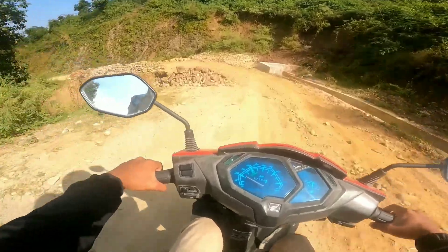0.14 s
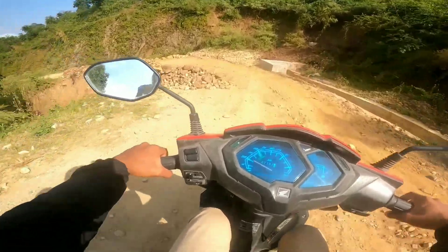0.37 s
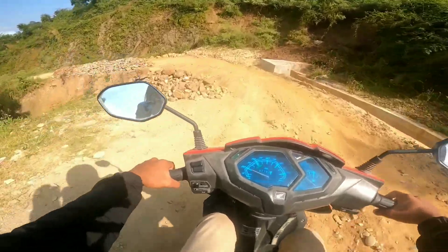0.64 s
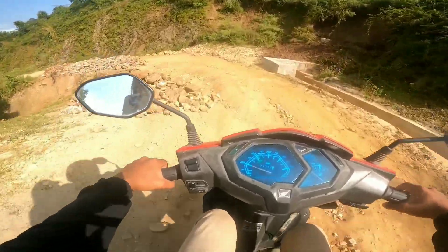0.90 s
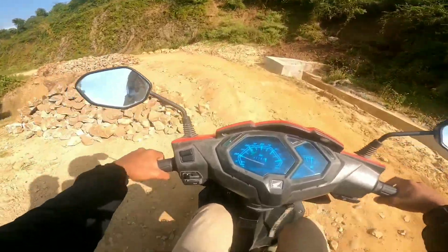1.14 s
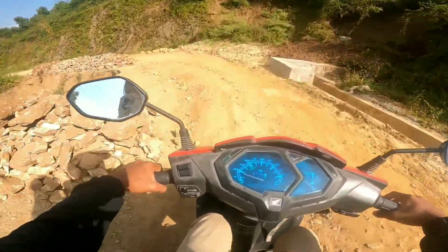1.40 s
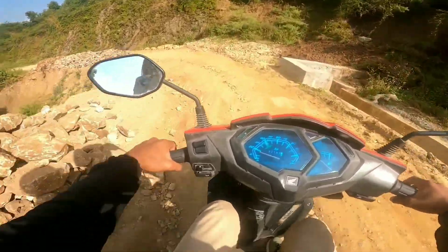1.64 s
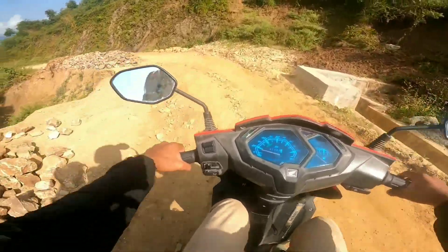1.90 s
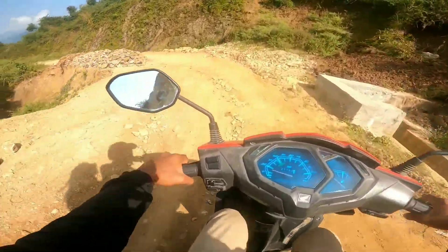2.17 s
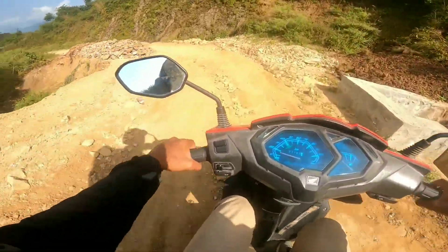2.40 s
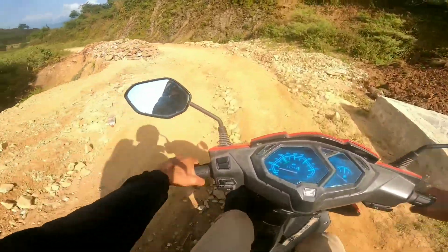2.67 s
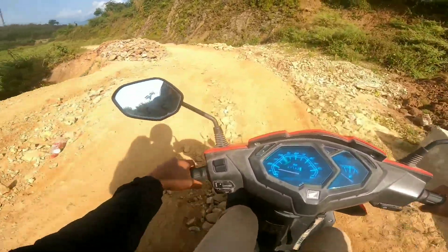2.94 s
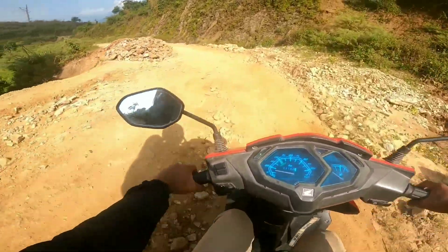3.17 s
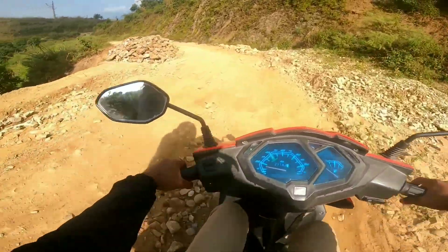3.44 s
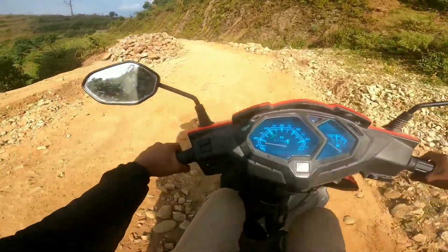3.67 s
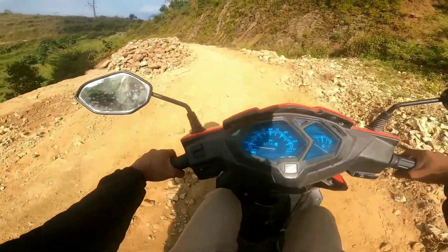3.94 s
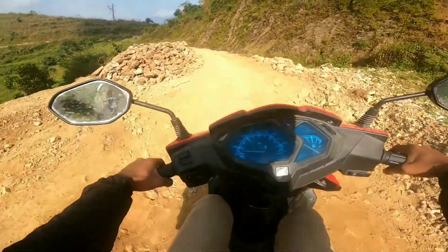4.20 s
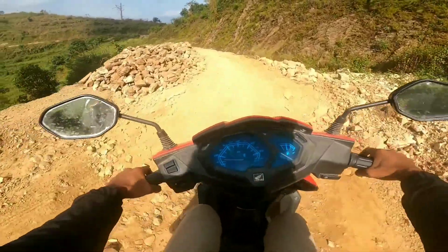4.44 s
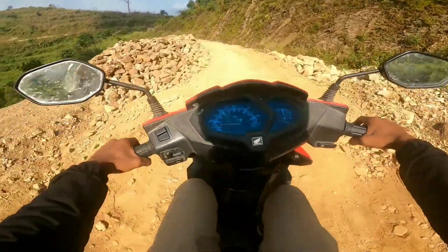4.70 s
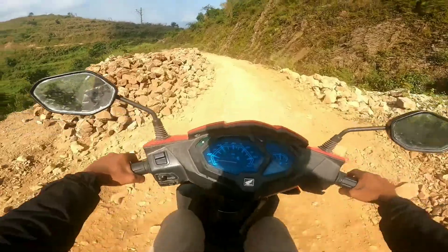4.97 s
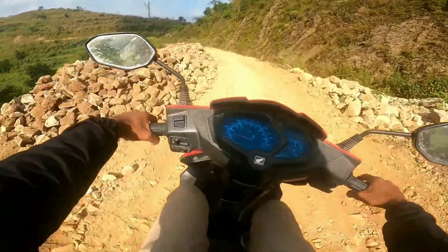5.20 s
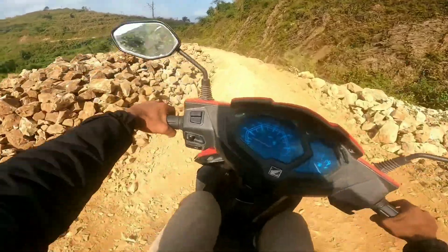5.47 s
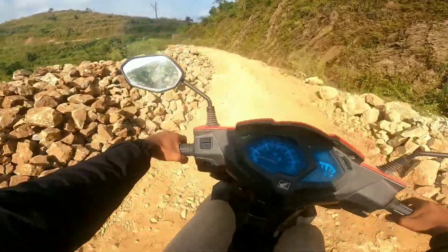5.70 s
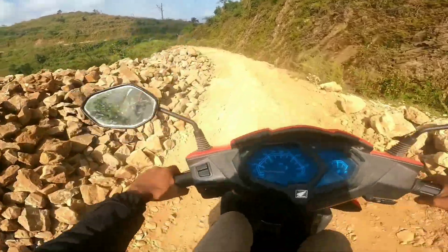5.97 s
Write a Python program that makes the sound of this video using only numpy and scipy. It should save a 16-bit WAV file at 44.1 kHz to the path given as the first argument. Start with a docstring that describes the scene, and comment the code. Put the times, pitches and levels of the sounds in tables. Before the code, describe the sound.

A scooter rolls slowly over a rough gravel track, heard close from a covered microphone worn by the rider, with dulled treble and no obvious echo. Gusty low wind, a faint wavering engine throb and thin tyre hiss run throughout. The first second is fairly light: hollow panel rumble, soft frame thumps around 0.4 and a few small clacks. From 1.1 to 1.9 the gravel thickens, with crunch, clustered stone ticks and firmer thumps. Hard knocks and clacks burst out near 2.15, 2.5 and 2.8, followed by a brief lull. The roughest jolts come at 3.3 to 3.8, with a sharp clack, short squeaks and a heavy floorboard knock near 3.6. After another easing, strong thumps land around 4.3. Lighter rattles continue past 5, thinning before a heavy bump at 5.75 and a smaller one near 5.93, still rolling at the end.

```python
"""Scooter on a gravel track

A scooter rolls slowly over rough gravel, heard from a microphone worn by the rider.
Coloured noise makes the wind and the tyre hiss, and a wavering sine makes the engine's low throb.
Random stone contacts ring the body panels and smaller parts into a hollow rumble and crunch.
Bumps thump the frame, stones knock the floorboard, loose parts clack and squeak: short pushes that ring.
Small stones tick against the underside as quick puffs of noise."""
import sys
import numpy as np
from scipy import signal
from scipy.fft import rfft, irfft
from scipy.io import wavfile

SR = 44100
rng = np.random.default_rng(int(sys.argv[2]) if len(sys.argv) > 2 else 0)


def generate_wav(sig):
    """Save sig (samples, or channels by samples) to the path in sys.argv[1] as 16-bit PCM at SR."""
    pcm = np.round(np.clip(np.atleast_2d(sig).T, -1, 1) * 32767).astype(np.int16)
    wavfile.write(sys.argv[1], SR, pcm)


def invert_db(x):
    """Field ratio 10**(x/20) for x, a level in decibels (scalar or array-like)."""
    u = np.asarray(x, float) / 20
    return 10 ** u


N = 269004  # length in samples

# colour of the tyre noise: (pitch_hz, relative level_db per Hz)
GRIT_COLOUR = [(1500, 9.5), (2000, -3.5), (2600, 0.5), (3600, -4), (4700, -4), (6000, -11), (9000, -12.5),
               (16000, -22.5)]
# rings of the loose parts: (pitch_hz, relative level_db, time to fall 60 dB t60_s)
LOOSE_PART_RINGS = [(1321, -2.5, 0.058), (1420, -4.5, 0.029), (1697, -3.5, 0.026), (1770, 10, 0.028),
                    (1923, -5.5, 0.044), (2035, -3, 0.037), (2340, 6.5, 0.027), (2780, 2.5, 0.027),
                    (3600, 2.5, 0.013), (3900, 0, 0.014), (4700, -6, 0.023)]


def rms_one(x):
    """Scale to unit rms, the usual measure of average strength."""
    return x / np.sqrt(np.mean(x ** 2) + 1e-20)


def in_time(rows):
    """Turn the columns of a table into curves over time, with one value a sample."""
    s, *columns = np.transpose(rows)
    return [np.interp(np.arange(N) / SR, s, c) for c in columns]


def drift(rate_hz):
    """Slow chance: noise at every 20th sample, smoothed twice by a one-pole low-pass; rms 1."""
    r = np.exp(-2 * np.pi * rate_hz * 20 / SR)
    noise = rng.standard_normal(N // 20 + 2002)
    slow = signal.lfilter([1], [1, -2 * r, r * r], noise)[2000:]  # skip the filter's start
    return np.interp(np.arange(N) / 20, np.arange(len(slow)), rms_one(slow))


def ring(clicks, hz, t60_s):
    """A resonance: each unit click starts a dying sine of height 1, down 60 dB after t60_s."""
    r = invert_db(-60 / (t60_s * SR))
    w = 2 * np.pi * hz / SR
    return signal.lfilter([0, np.sin(w)], [1, -2 * r * np.cos(w), r * r], clicks + 1e-18)


def coloured(spectrum, envelope, patchy_db, patch_rate_hz):
    """Third-octave bands of noise under an envelope, each band with its own level and flicker."""
    hz_points, db_points = np.transpose(spectrum)
    octaves = np.log2(hz_points[-1] / hz_points[0])
    edges = hz_points[0] * 2 ** np.arange(0, octaves, 1 / 3)
    white = envelope * rng.standard_normal((2, N)) + 1e-18
    out = 0
    for k, (low, high) in enumerate(zip(edges, edges[1:])):
        band_filter = signal.butter(2, [low, high], "band", fs=SR, output="sos")
        band = signal.sosfilt(band_filter, white[k % 2])  # neighbours use different noise
        level_db = np.interp(np.log(low * high) / 2, np.log(hz_points), db_points)
        out = out + band * invert_db(level_db + patchy_db * drift(patch_rate_hz))
    return out


def stones_into(modes, per_s, spread_db, clumps, waver_db):
    """Clumped random stone contacts each strike a random share of the wavering rings; rms 1."""
    sizes = invert_db(spread_db * np.minimum(rng.exponential(1, N), 4)) * rng.choice([-1, 1], N)
    contacts = sizes * (rng.random(N) < per_s * clumps / SR)
    out = 0
    for hz, db, t60_s in modes:
        luck = rng.standard_normal(N)
        reached = rng.random(N) < 0.6  # share of contacts that reach this ring
        load = invert_db(waver_db * drift(9.1))  # rings come and go as the load shifts
        out = out + invert_db(db) * ring(contacts * luck * reached * load, hz, t60_s)
    return rms_one(out)


def blows(events, modes, swell_s, rough, off_db_per_octave):
    """A brief uneven push, then rings shifted to the favoured pitch and weaker away from it."""
    strike_spread_db = 5.5  # how unevenly a blow sets the rings going
    out, size, swell = np.zeros(N + SR), SR // 4, round(swell_s * SR)
    t = np.arange(swell) / SR
    pitches = np.array(modes)[:, 0]
    chances = rng.standard_normal((len(events), 1200))
    for (mid_s, peak_db, favoured_hz), chance in zip(events, chances):
        nearest = np.argmin(np.abs(np.log(pitches / favoured_hz)))
        shift = favoured_hz / pitches[nearest]  # the part's seating moves all its pitches
        body = 0
        for (hz, db, t60_s), luck in zip(modes, chance[::-1]):
            pitch_hz = hz * shift
            push = np.zeros(size)
            push[:swell] = np.hanning(swell) * (np.cos(2 * np.pi * pitch_hz * t) + rough * chance[:swell])
            octaves_off = abs(np.log2(pitch_hz / favoured_hz))
            strength_db = db + strike_spread_db * luck - off_db_per_octave * octaves_off
            body = body + invert_db(strength_db) * ring(push, pitch_hz, t60_s)
        start = max(round(mid_s * SR) - swell // 2, 0)
        out[start:start + size] += invert_db(peak_db) * body / np.max(np.abs(body))
    return out[:N]


def wind():
    """Wind buffets the microphone: deep noise that follows the gusts, with random buffeting on top."""
    # points on the curve of the gusts: (time_s, level_db before buffeting)
    gusts = [(0.0, -39.5), (0.73, -37.5), (0.78, -43), (0.87, -34), (1.82, -29), (2.07, -39.5), (2.24, -28),
             (2.28, -36), (2.51, -28.5), (3.02, -40.5), (3.06, -29), (3.11, -36.5), (3.67, -29.5),
             (4.13, -38), (4.23, -27.5), (4.48, -44.5), (4.69, -31.5), (5.25, -29.5), (5.47, -35),
             (5.69, -31), (5.71, -42), (6.1, -33.5)]
    # colour of the wind: (pitch_hz, relative level_db per Hz)
    wind_colour = [(12, 1.5), (18, 9), (30, -3.5), (45, 0), (70, 2.5), (100, -1), (200, -5), (280, -16.5)]
    buffet_db, buffet_rate_hz = -2, 0.91
    level_db = in_time(gusts)[0] + buffet_db * drift(buffet_rate_hz)
    return invert_db(level_db) * rms_one(coloured(wind_colour, 1, 0.97, 33.0))


def engine():
    """The firing rate reaches the rider as a deep throb: a sine whose pitch wavers."""
    # points on the curves of the throb: (time_s, firing rate pitch_hz before wavering, rms level_db)
    throb = [(0.0, 24, -43.5), (0.13, 24.1, -38.5), (0.25, 26.15, -50.5), (0.64, 26.18, -34.5),
             (0.81, 27.14, -42.5), (0.93, 28.4, -44), (1.32, 28.7, -38), (1.58, 22.75, -39),
             (1.72, 21.58, -40.5), (1.87, 29.2, -40), (2.36, 30.36, -35.5), (2.94, 26.94, -42.5),
             (3.62, 27.76, -30.5), (3.94, 31.83, -41), (4.4, 32.58, -39), (4.5, 30.34, -39),
             (4.93, 31.84, -32), (5.1, 30.17, -34.5), (5.38, 29.2, -41), (5.72, 28.1, -45.5),
             (5.91, 26.1, -40.5), (6.1, 25.9, -31)]
    hz, level_db = in_time(throb)
    phase = 2 * np.pi * np.cumsum(hz * (1 + 0.119 * drift(4.75))) / SR
    return np.sqrt(2) * invert_db(level_db) * np.sin(phase)


def rolling_hiss():
    """The steady tyre hiss that stays between stony patches."""
    return invert_db(-57) * rms_one(coloured(GRIT_COLOUR, 1, 1.0, 25))


def grit(patch):
    """Tyres throw up fine grit: hiss with dying grains in it, more of them on loose patches."""
    # points on the curve of the thrown grit: (time_s, relative level_db)
    spray = [(0.0, -57), (0.07, -49), (0.67, -55), (1.15, -48.5), (1.18, -44.5), (1.3, -54), (1.37, -43.5),
             (1.42, -48), (1.47, -42), (1.69, -56.5), (1.76, -43), (2.01, -61.5), (2.04, -37), (2.1, -59),
             (2.16, -44.5), (2.18, -47), (2.45, -52), (2.55, -41), (2.62, -49.5), (2.79, -53), (2.82, -44),
             (2.86, -58), (3.01, -58), (3.08, -45), (3.13, -59), (3.26, -51), (3.29, -37), (3.38, -49),
             (3.46, -52), (3.5, -38.5), (3.52, -44.5), (3.65, -43.5), (4.09, -60), (4.16, -50),
             (4.22, -50.5), (4.28, -40), (4.45, -51), (4.46, -42), (4.48, -55), (4.56, -56.5),
             (4.72, -45.5), (4.8, -53), (4.97, -50), (5.02, -41.5), (5.15, -49), (5.19, -47), (5.22, -48),
             (5.27, -44), (5.34, -53), (5.38, -42), (5.41, -55), (5.58, -47), (5.61, -52), (5.73, -54.5),
             (5.76, -41), (5.8, -58), (5.9, -54), (5.93, -47), (6.05, -47), (6.07, -44)]
    grains_per_s, grain_spread_db, grain_t60_s = 320, 4.5, 0.014
    sizes = invert_db(grain_spread_db * np.minimum(rng.exponential(1, N), 4) - 4.0)
    grains = sizes * (rng.random(N) < grains_per_s * invert_db(3.0 * patch) / SR)
    crackle = signal.lfilter([1], [1, -invert_db(-60 / (grain_t60_s * SR))], grains)
    noise = rms_one(coloured(GRIT_COLOUR, invert_db(1.0 * patch) + 0.22 * crackle, 3.3, 19))
    return invert_db(in_time(spray)[0] - 1.5) * noise


def ticks():
    """A small stone's tick is a puff of noise that builds fast and dies fast; dull ones lose their top."""
    # stones on the underside: (start_s, relative level_db, dullness 0-1, time to fall 60 dB t60_s)
    tick_events = [(0.178, -35, 0.7, 0.016), (0.344, -43, 0.7, 0.016), (0.483, -43, 0.1, 0.013),
                   (0.596, -51, 0.2, 0.012), (0.705, -38, 0.7, 0.019), (0.766, -39, 0.6, 0.017),
                   (0.959, -29, 0.78, 0.021), (1.061, -33, 0.8, 0.016), (1.1316, -30, 0.96, 0.02),
                   (1.1702, -27, 0.8, 0.016), (1.192, -30, 0.6, 0.018), (1.2392, -27, 0.74, 0.021),
                   (1.3452, -22.5, 0.77, 0.018), (1.4606, -30.5, 0.7, 0.02), (1.515, -35.5, 0.1, 0.023),
                   (1.5605, -29, 0.8, 0.031), (1.7484, -28.5, 1, 0.02), (1.788, -37, 0.2, 0.026),
                   (1.855, -34.5, 0.54, 0.016), (2.0382, -30.5, 0.6, 0.037), (2.136, -37, 0.6, 0.015),
                   (2.15, -16, 0.72, 0.018), (2.228, -32, 0.4, 0.014), (2.294, -30, 0.57, 0.026),
                   (2.373, -33, 0.7, 0.016), (2.4369, -40, 0.5, 0.014), (2.48, -34, 0.25, 0.02),
                   (2.5535, -20, 0.55, 0.014), (2.59, -29, 0.84, 0.017), (2.68, -31, 0.85, 0.022),
                   (2.8132, -27.5, 0.6, 0.016), (3.0666, -34, 0.85, 0.036), (3.094, -36, 0.65, 0.013),
                   (3.2776, -34, 0.35, 0.018), (3.288, -29, 0.56, 0.029), (3.2995, -18, 0.47, 0.023),
                   (3.33, -30, 0.3, 0.019), (3.4037, -29, 0.8, 0.012), (3.4949, -22, 0.72, 0.034),
                   (3.57, -24, 0.82, 0.019), (3.6032, -26, 0.5, 0.014), (3.6542, -29, 0.4, 0.023),
                   (3.702, -41, 0.3, 0.013), (3.7268, -27, 0.76, 0.023), (3.766, -35, 0.5, 0.016),
                   (3.8072, -28, 0.53, 0.022), (4.128, -26.5, 0.78, 0.014), (4.1634, -32, 0.9, 0.02),
                   (4.237, -40, 0.6, 0.016), (4.2634, -20, 0.73, 0.021), (4.291, -27.5, 0.1, 0.021),
                   (4.31, -31, 0.3, 0.013), (4.335, -37, 0.4, 0.022), (4.368, -36, 0.2, 0.05),
                   (4.4, -40.5, 0.4, 0.027), (4.43, -37, 0.5, 0.03), (4.4575, -21.5, 0.56, 0.0089),
                   (4.64, -34, 0.2, 0.019), (4.714, -34, 0.3, 0.035), (4.7367, -34.5, 0.3, 0.027),
                   (4.916, -32.5, 0.3, 0.015), (4.984, -25, 1, 0.019), (5.018, -20.5, 0.63, 0.013),
                   (5.045, -32, 0.5, 0.024), (5.096, -35, 1, 0.016), (5.165, -34, 0.2, 0.021),
                   (5.259, -34, 0.8, 0.024), (5.2787, -27.5, 0.4, 0.02), (5.353, -32, 0.7, 0.012),
                   (5.3706, -26.5, 0.27, 0.016), (5.4967, -41, 0.2, 0.014), (5.558, -28, 0.79, 0.019),
                   (5.754, -25.5, 0.8, 0.018), (5.9155, -39, 0.5, 0.013), (5.9501, -32.5, 0.27, 0.036),
                   (5.978, -30.5, 0.2, 0.018)]
    # colour of the ticks: (pitch_hz, relative level_db per Hz)
    tick_colour = [(1500, -5.5), (2600, -4), (4000, -6.5), (5500, -10), (8000, -12.5), (16000, -17)]
    rise_s = 0.0014
    puffs, t = np.zeros((2, N + SR)), np.arange(SR // 10) / SR
    for s, level_db, dullness, t60_s in tick_events:
        share, start = np.clip(dullness, 0, 1), round(s * SR)
        puff = invert_db(level_db - 60 * t / max(t60_s, .003)) * np.minimum(t / rise_s, 1)
        puffs[:, start:start + len(t)] += np.outer([1 - share, share], puff)
    soften = signal.butter(2, 3000, fs=SR, output="sos")  # low-pass at 3000 Hz
    bright = coloured(tick_colour, puffs[0, :N], 2.5, 30)
    muffled = signal.sosfilt(soften, coloured(tick_colour[:4], puffs[1, :N], 1.8, 33))
    return invert_db(13) * bright + invert_db(11.5) * muffled


def squeaks():
    """Loose parts rub for a moment: a longer push gives a held ring."""
    # squeaks: (middle of the push mid_s, peak level_db, favoured pitch_hz)
    squeak_events = [(1.702, -49, 3880), (3.311, -30, 1427), (3.352, -28, 1420), (3.665, -36.5, 1750),
                     (3.68, -38.5, 1890), (4.835, -35, 1740), (3.972, -39.5, 1510)]
    return blows(squeak_events, LOOSE_PART_RINGS, 0.026, rough=1.4, off_db_per_octave=112)


def clacks():
    """Loose parts clack: a short rough push sets them ringing."""
    # clacks: (middle of the push mid_s, peak level_db, favoured pitch_hz)
    clack_events = [(0.064, -33, 1777), (0.178, -37.5, 1670), (0.366, -52, 1800), (0.468, -34.5, 1770),
                    (1.138, -29, 1773), (1.139, -42, 2780), (1.174, -39.5, 3600), (1.174, -35, 2340),
                    (1.177, -32, 1304), (1.198, -35, 2780), (1.194, -27.5, 1932), (1.202, -35.5, 1840),
                    (1.462, -23.5, 1789), (1.49, -30.5, 1770), (1.51, -32, 1420), (1.568, -34.5, 2780),
                    (1.765, -27.5, 1260), (1.8285, -35.5, 1760), (1.93, -31, 1396), (2.046, -28, 1850),
                    (2.054, -28, 1636), (2.155, -18, 1785), (2.155, -36, 2040), (2.298, -27.5, 1760),
                    (2.379, -23, 1780), (2.443, -29.5, 1730), (2.447, -37, 1970), (2.5543, -26.5, 1680),
                    (2.813, -38.5, 3500), (2.814, -19.5, 1770), (2.849, -32, 1620), (3.28, -29.5, 1860),
                    (3.292, -15, 1785), (3.332, -21, 1760), (3.386, -42, 1770), (3.4, -41, 1880),
                    (3.497, -19.5, 1760), (3.6047, -24.5, 1420), (3.702, -38, 3900), (3.729, -33, 2340),
                    (3.816, -29, 1950), (4.16, -28, 1363), (4.247, -32.5, 1930), (4.277, -37, 4490),
                    (4.283, -28.5, 1430), (4.319, -31, 1946), (4.292, -36, 2470), (4.43, -29.5, 1500),
                    (4.459, -36, 2227), (4.668, -32, 1970), (4.9312, -30.5, 1940), (4.996, -33.5, 1360),
                    (5.017, -26.5, 1510), (5.096, -28.5, 1976), (5.185, -24, 1420), (5.18, -42, 4360),
                    (5.19, -38, 2460), (5.375, -33, 2780), (5.3764, -28.5, 1740), (5.722, -36, 1750),
                    (5.757, -34.5, 4700), (5.758, -32.5, 1925), (5.937, -23, 1900), (5.994, -30, 1810)]
    return blows(clack_events, LOOSE_PART_RINGS, 0.010, rough=4, off_db_per_octave=53)


def knocks():
    """Larger stones knock the floorboard: a very short, very rough push sets it ringing."""
    # knocks: (middle of the push mid_s, peak level_db, favoured pitch_hz)
    knock_events = [(1.232, -37, 727), (1.374, -22, 904), (1.438, -24.5, 600), (1.498, -31.5, 560),
                    (1.565, -25, 538), (1.78, -29.5, 723), (2.006, -24.5, 560), (2.058, -20, 550),
                    (2.117, -27, 726), (2.152, -17, 978), (2.47, -20, 747), (2.532, -12.5, 532),
                    (2.639, -25.5, 765), (2.798, -28, 823), (2.812, -17, 560), (3.064, -25.5, 608),
                    (3.173, -28, 597), (3.265, -22, 558), (3.286, -18.5, 775), (3.484, -17, 624),
                    (3.378, -36, 1110), (3.615, -11, 528), (3.701, -31, 1100), (3.819, -21, 930),
                    (3.945, -24.5, 697), (4.164, -21.5, 1010), (4.218, -24.5, 1070), (4.268, -24, 744),
                    (4.311, -27, 974), (4.356, -28.5, 928), (4.628, -27, 560), (4.771, -25, 780),
                    (4.889, -28, 1065), (4.997, -25.5, 954), (5.689, -21.5, 540), (5.7555, -19, 787),
                    (5.937, -19.5, 560)]
    # rings of the floorboard: (pitch_hz, relative level_db, time to fall 60 dB t60_s)
    floorboard = [(590, -10, 0.032), (555, 6, 0.028), (715, 9, 0.024), (880, 7, 0.022), (1052, 4, 0.032)]
    return blows(knock_events, floorboard, 0.00357, rough=7.2, off_db_per_octave=28)


def thumps():
    """Bumps thump the frame: a short, fairly smooth push sets its low rings going."""
    # thumps: (middle of the push mid_s, peak level_db, favoured pitch_hz)
    thump_events = [(0.017, -27, 194.4), (0.262, -22.5, 243), (0.364, -16.5, 267), (0.417, -20, 258),
                    (0.766, -26, 211), (1.035, -34, 191), (1.11, -15, 301), (1.385, -23.5, 265),
                    (1.438, -23, 215), (1.515, -12, 302), (1.785, -23.5, 242), (1.822, -13, 300),
                    (1.932, -18.5, 253), (2.055, -22.5, 300), (2.24, -24.5, 240), (2.495, -18.5, 295),
                    (2.567, -16.5, 265), (2.637, -14.5, 243), (3.007, -21, 261), (3.276, -23.5, 209),
                    (3.291, -18.5, 301), (3.316, -16, 252), (3.483, -19, 246), (3.55, -17.5, 300),
                    (3.629, -16, 252), (3.709, -15, 249), (3.808, -15.5, 283.5), (4.273, -12, 290),
                    (4.374, -10, 257), (4.403, -26.5, 265), (4.624, -25.5, 292), (3.765, -20.5, 235),
                    (5.08, -21.5, 253), (5.28, -38, 249), (5.659, -22.5, 268), (5.761, -11, 233.5),
                    (5.797, -29.5, 300), (5.93, -16.5, 252)]
    # rings of the frame: (pitch_hz, relative level_db, time to fall 60 dB t60_s)
    frame_rings = [(196, 4.5, 0.015), (239.5, 1, 0.096), (265, -3.5, 0.083), (300, -3.5, 0.05),
                   (420, 8.5, 0.04)]
    return blows(thump_events, frame_rings, 0.0062, rough=0.6, off_db_per_octave=34.5)


def crunch(patch):
    """Loose gravel crunches: stone contacts ring smaller parts and stones very briefly."""
    # points on the curve of how much loose gravel the tyres meet: (time_s, level_db)
    gravel = [(0.0, -36.5), (0.24, -40), (0.29, -37.5), (0.59, -42), (1.03, -39), (1.05, -34.5),
              (1.31, -39.5), (1.38, -31.5), (1.41, -43), (1.44, -34), (1.53, -31.5), (1.7, -40),
              (1.78, -32.5), (1.83, -27.5), (1.87, -37), (2.0, -43), (2.05, -31), (2.09, -47.5),
              (2.16, -28), (2.17, -35), (2.44, -38), (2.48, -34), (2.51, -34.5), (2.56, -26), (2.6, -37.5),
              (2.77, -41.5), (2.82, -34.5), (2.85, -41), (3.06, -43), (3.07, -38.5), (3.16, -42.5),
              (3.18, -34.5), (3.19, -47.5), (3.29, -31.5), (3.36, -35), (3.43, -40), (3.5, -30.5),
              (3.53, -33), (3.6, -31), (4.09, -46), (4.16, -31), (4.21, -39), (4.28, -32), (4.54, -47),
              (4.64, -35), (4.84, -40), (4.86, -47), (4.93, -34.5), (4.94, -45), (4.98, -48), (4.99, -32),
              (5.4, -37), (5.52, -35.5), (5.74, -38.5), (5.76, -25), (5.78, -40), (5.88, -46), (5.93, -31),
              (6.07, -41.5), (6.1, -28.5)]
    # rings of smaller parts and stones: (pitch_hz, relative level_db, time to fall 60 dB t60_s)
    small_parts = [(560, 6, 0.0071), (756, -3.5, 0.021), (813, -4.5, 0.013), (1084, -1, 0.014),
                   (1395, -4.5, 0.013), (1760, -10, 0.012), (1962, -16, 0.022), (2226, -10, 0.0089),
                   (3080, -18, 0.0069), (3900, -28.5, 0.0033), (4700, -18.5, 0.0039)]
    stones = stones_into(small_parts, 1700, 2.02, invert_db(1.7 * patch), waver_db=1.5)
    return invert_db(in_time(gravel)[0]) * stones


def rumble(patch):
    """The wheels shake the body: stone contacts ring the panels into a hollow rumble."""
    # points on the curve of how hard the wheels shake the body: (time_s, relative level_db)
    shake = [(0.0, -31.5), (0.03, -25), (0.22, -31.5), (0.24, -38), (0.27, -29), (0.46, -28), (0.66, -34.5),
             (0.7, -30.5), (0.95, -31), (1.19, -24), (1.31, -33), (1.39, -23.5), (1.41, -26), (1.53, -20),
             (1.63, -33), (1.82, -23), (1.9, -28.5), (1.93, -24), (1.99, -34.5), (2.05, -23), (2.09, -26),
             (2.48, -26.5), (2.5, -15), (2.56, -20), (2.62, -28.5), (2.65, -28), (2.68, -33.5),
             (2.84, -27.5), (2.85, -33), (3.25, -29), (3.29, -18.5), (3.43, -32.5), (3.5, -18),
             (3.53, -28.5), (3.6, -20), (3.64, -16.5), (3.65, -23.5), (4.03, -33), (4.23, -26), (4.28, -20),
             (4.3, -26), (4.35, -30), (4.38, -23.5), (4.4, -27), (4.54, -33.5), (4.7, -25), (4.94, -35.5),
             (4.99, -23.5), (5.5, -28.5), (5.61, -25), (5.64, -34), (5.69, -27.5), (5.74, -36.5),
             (5.76, -24), (5.78, -29), (5.79, -28.5), (5.89, -30.5), (5.93, -28.5), (5.96, -28),
             (6.1, -27.5)]
    # rings of the body panels: (pitch_hz, relative level_db, time to fall 60 dB t60_s)
    panels = [(147.7, -10.5, 0.1), (191.5, -3, 0.061), (252, 0, 0.051), (301.7, 2, 0.038), (403, 0, 0.03),
              (443, -1.5, 0.039), (516, -9, 0.033), (528, -13, 0.031), (600, -13, 0.015)]
    clumps = invert_db(0.8 * patch + 1.1 * drift(30))
    return invert_db(in_time(shake)[0] - 2) * stones_into(panels, 1300, 2.03, clumps, waver_db=0.8)


def scene():
    """Add all the layers; patches of loose stones thicken rumble, crunch and grit together."""
    patch = drift(18)
    background = wind() + engine() + rolling_hiss()
    hits = ticks() + squeaks() + clacks() + knocks() + thumps()
    gravel_track = grit(patch) + crunch(patch) + rumble(patch)
    return (background + hits + gravel_track)[None]  # one channel


def band_limit(x):
    """A steep low-pass at the top of the band."""
    return signal.sosfilt(signal.butter(12, 15500, fs=SR, output="sos"), x)


def record(dry):
    """A shrouded microphone: the treble falls away steeply, with a small port resonance near the top."""
    # response of the microphone: (pitch_hz, level_db)
    microphone = [(12, -27), (22, 1.5), (5200, 0.5), (5900, -4.5), (6500, -10.5), (8000, -17.5),
                  (10000, -27), (11000, -36.5), (12800, -20), (13500, -32), (14300, -33.5), (15500, -38)]
    points_hz, points_db = np.transpose(microphone)
    hz = np.fft.rfftfreq(N, 1 / SR)
    response_db = np.interp(np.log(hz + 1), np.log(points_hz), points_db)
    mix = irfft(rfft(dry) * invert_db(response_db), N)
    return band_limit(mix)


dry = scene()
out = record(dry)
generate_wav(out)
```